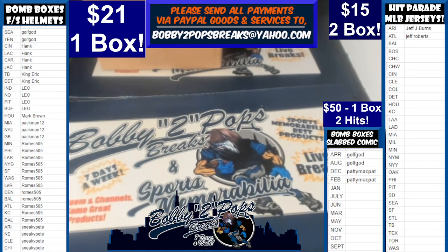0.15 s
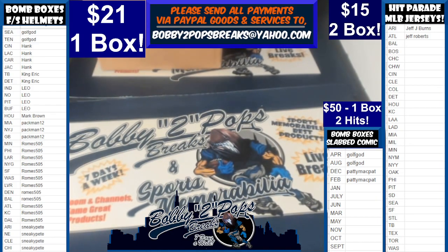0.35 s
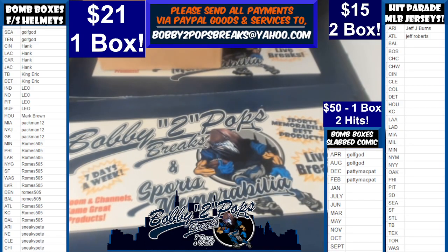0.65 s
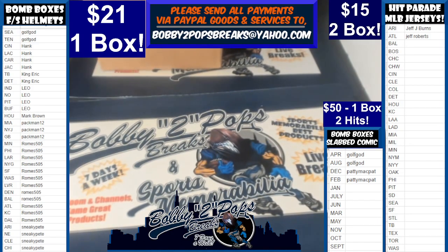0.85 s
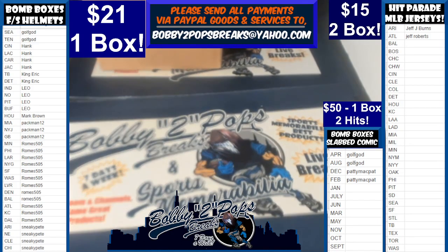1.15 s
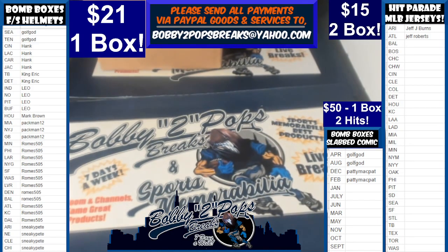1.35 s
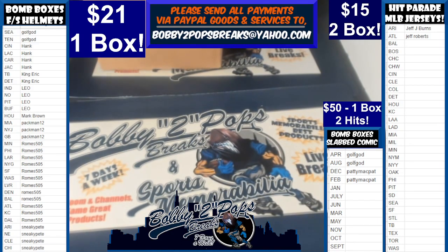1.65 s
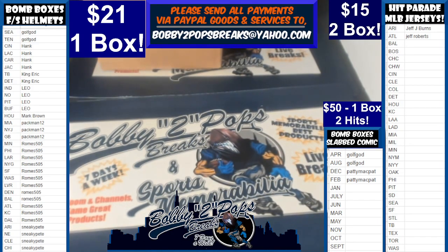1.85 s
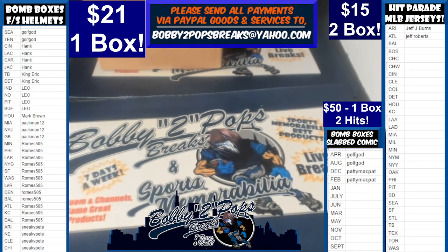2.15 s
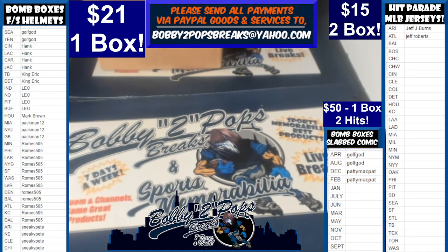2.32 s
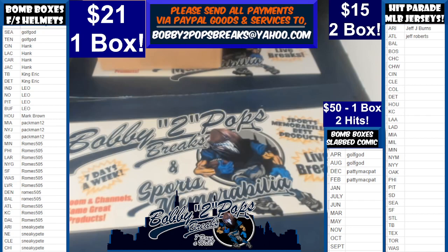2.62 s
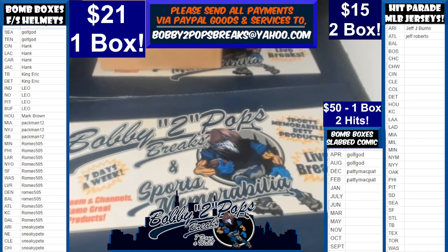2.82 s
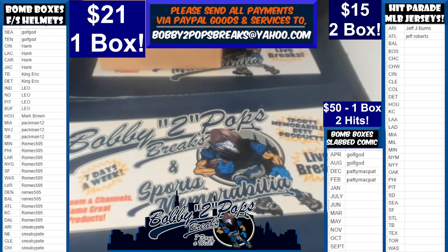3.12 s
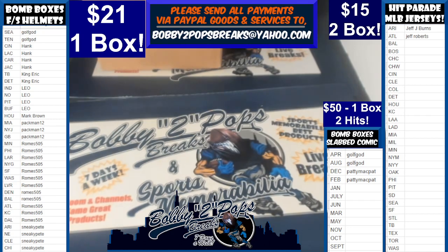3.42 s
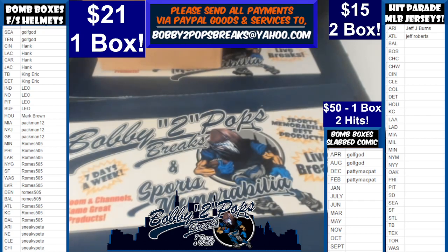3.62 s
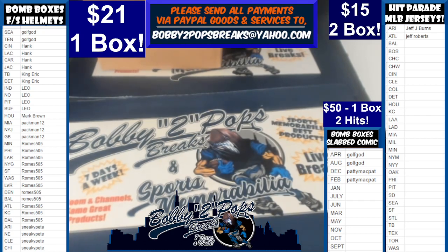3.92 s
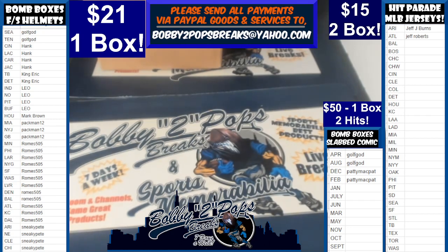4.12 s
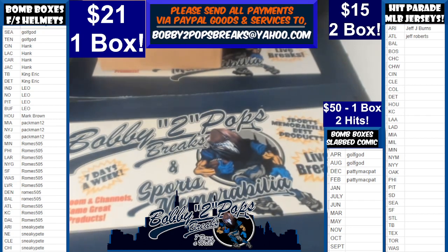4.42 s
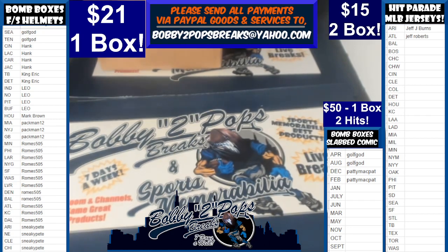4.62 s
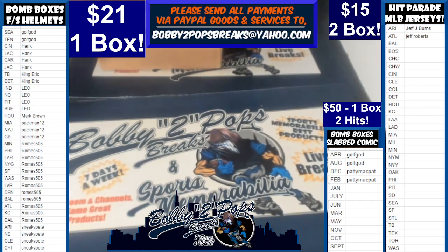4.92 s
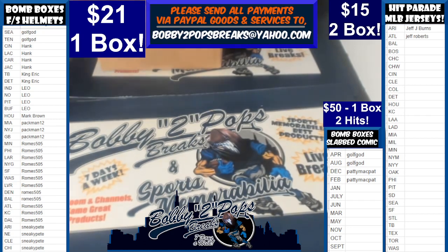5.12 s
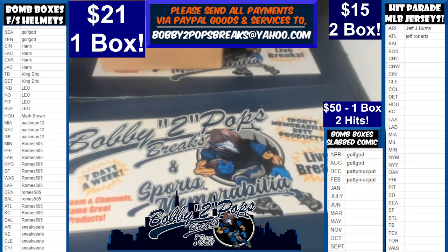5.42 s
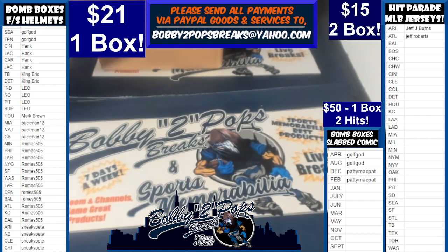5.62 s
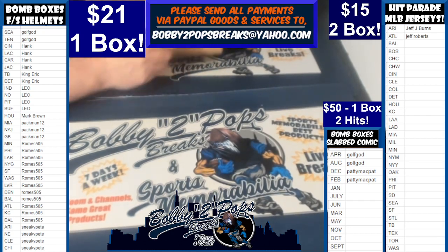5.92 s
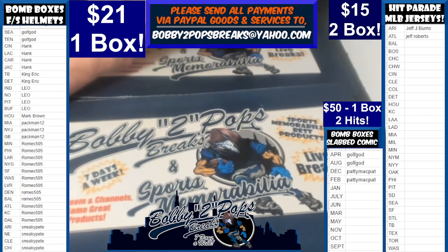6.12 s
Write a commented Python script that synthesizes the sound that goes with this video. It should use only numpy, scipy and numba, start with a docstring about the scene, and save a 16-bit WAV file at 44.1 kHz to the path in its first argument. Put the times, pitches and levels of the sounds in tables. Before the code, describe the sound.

A close, dry tabletop scene in a small soft room, with a very faint steady hum and air noise beneath. From 0 to 1 second a hand makes soft, gritty brushes on card and cloth, with a muted knock at the start and tiny edge ticks. Fuller strokes come around 1.1 to 1.8 seconds, then a near lull. From 2.3 to 3.2 seconds the rubbing is longer and stronger, swelling unevenly. A tight cluster of crisp clicks falls at 3.5. A broad, heavier swipe passes at 4.0, followed by faint rustles and a short, thin, rising squeak near 4.5. At 4.94 a box knocks down sharply, with a brief scrape at 5.15; a second hard knock hits at 5.38, and a duller bump follows at 5.6. Short slides and light brushes fade away, with a small tick at 6.13 and a soft low tap near 6.24.

```python
"""A hand's gritty hiss on card and cloth is heard first, with a soft knock in it; strokes swell and die away.
Small edges tick, a fingertip squeaks on glossy card and two boxes knock down hard on a covered table.
Friction is modelled as grainy noise under a moving spectrum, sliding as noise driving broad resonances,
and impact as decaying modes with a crack and a rattle; faint machine tones and air noise lie beneath."""
import sys
import numpy as np
from scipy import signal
from scipy.fft import rfft, irfft
from scipy.io import wavfile
from scipy.ndimage import uniform_filter1d
from numba import njit

SR = 44100
rng = np.random.default_rng(int(sys.argv[2]) if len(sys.argv) > 2 else 0)


def wav_record(signal):
    """Record a signal, one row per channel, as 16-bit PCM in the file named by sys.argv[1]."""
    frames = np.transpose(np.atleast_2d(signal))
    bounded = np.clip(frames, -1, 1)
    # unit amplitude maps onto the largest positive 16-bit level
    quanta = np.round(bounded * 32767).astype(np.int16)
    wavfile.write(sys.argv[1], SR, quanta)


N = 276286

# Machine tones: mean [f/Hz, rms level/dB]
HUM_TONES = [(253.0, -74.5), (306.8, -82.5), (344.5, -84), (441.4, -78.5), (511.4, -86.5)]
# Spectrum of the air noise: [f/Hz, relative density/dB per Hz]
AIR_SPECTRUM = [(18, -46), (30, -13.5), (163, -12.5), (253, -3), (384, -11), (437, -1), (497, -9.5),
                (859, -8.5), (1200, -12.5), (1410, -12), (7830, -31.5), (15000, -41)]
AIR_DB = -71.5  # rms before its slow swell
# Edges ticking: [t/s, nominal level/dB, f/Hz, t60 of the scratchy tail/s]
EDGE_TICKS = [(0.4738, -52, 7290, 0.029), (0.622, -54, 9800, 0.018), (0.6722, -45, 7300, 0.014),
              (0.7563, -42, 3870, 0.023), (0.8919, -38, 5000, 0.019), (1.5227, -39.5, 5640, 0.019),
              (2.376, -58, 3760, 0.018), (2.7354, -38.5, 3000, 0.034), (3.1715, -44, 2860, 0.045),
              (3.4745, -34, 3700, 0.017), (3.4756, -33.5, 2060, 0.023), (3.4932, -27.5, 2580, 0.01),
              (3.494, -40.5, 1180, 0.05), (3.504, -28.5, 3220, 0.0043), (4.292, -57, 8510, 0.017),
              (4.593, -52, 6500, 0.025), (4.6067, -45, 6700, 0.024), (4.667, -65, 10000, 0.01),
              (4.8837, -54, 5760, 0.015), (5.1235, -47.5, 5600, 0.035), (5.6037, -34, 1300, 0.034),
              (5.618, -40, 1510, 0.051), (5.75, -56, 3400, 0.057), (6.128, -34, 8150, 0.011)]
# Blows: [t/s, level/dB, nominal contact/ms, table share/dB, box share/dB, crack/dB, rattle/dB]
BLOWS = [(0.023, -46, 1.6, -5, -11, -23, -10), (1.471, -57.5, 5.3, 9, -14, -30, -16),
         (3.4745, -55, 0.26, -4, -14, -10, -8), (3.493, -53.5, 0.15, -6, -5, -3, -0.5),
         (3.52, -60, 5.9, 4, -7, -30, -23), (4.9355, -27, 0.89, -8, -1.5, -27, -9),
         (4.9422, -20.5, 0.21, -13, -14.5, 12, -6), (4.957, -29.5, 0.71, -14, 3, -7, -6),
         (5.149, -36.5, 1.75, -19, 5.5, -32, -15), (5.3787, -19, 0.32, -3, -31, 4.5, -7),
         (5.3839, -23.5, 0.25, -18, -28, 11, -19), (5.397, -28.5, 2.4, -1.5, -24, -34.5, -4),
         (5.421, -39, 0.17, -2, -18, -9.5, -2), (5.603, -23, 4.7, -7, -9, -42, -10),
         (5.612, -38.5, 2.3, -18, 11, -40.5, -5), (6.128, -44.5, 1.6, -22, -14, -30, -1),
         (6.232, -50, 3.2, 6, -2, -28, -24), (6.2415, -35, 6.6, 0.5, -20, -27, -25)]
# Modes of the struck table: [f/Hz, level/dB, t60/s], nominal: each blow scatters f and level, shortens t60
TABLE_MODES = [(71, -10, 0.17), (140, -25, 0.11), (207, -7, 0.17), (253, -7, .12), (338, -5.5, 0.061),
               (435, -8, 0.17), (482, -28, 0.093), (600, -38, 0.076), (1099, -3, 0.099),
               (1840, -6.5, 0.082), (2080, -10.5, 0.12), (2220, -14, 0.058)]
# Modes of the struck box: [f/Hz, level/dB, t60/s], nominal in the same way
BOX_MODES = [(546, -15, 0.18), (625, -7, 0.11), (783, -18, 0.24), (1024, -23.5, 0.16), (1260, -6.5, 0.088),
             (1426, -12, 0.15), (1990, -27, 0.21), (2450, -31, 0.12), (3330, -27, 0.15), (3770, -19, 0.033)]
# Decay of the rattle bands: [f/Hz, t60/s]
RATTLE_DECAYS = [(300, 0.077), (800, 0.083), (2200, 0.026), (5500, 0.14), (10000, 0.068)]
# Strength of the same rattle bands: [f/Hz, relative level/dB]
RATTLE_LEVELS = [(300, -10), (800, 0.5), (2200, 0), (5500, -4.5), (10000, -33)]
# Low resonance of a sliding box: [f/Hz, nominal width/Hz, relative level/dB]
BOX_HUM_MODES = [(521, 44, 0.0038)]
# Upper resonances of a sliding box: [f/Hz, nominal width/Hz, relative level/dB]
BOX_UPPER_MODES = [(687, 68, -8.5), (786, 176, -8.5), (964, 580, -13.5)]
# Low resonances of the table under a slide: [f/Hz, nominal width/Hz, relative level/dB]
TABLE_THRUM_MODES = [(210.8, 28, -2.5), (67, 35, -11)]
# Weight dragged over the table: [t/s, hold/s, box hum/dB, box upper modes/dB, table thrum/dB]
DRAGS = [(0.031, .034, -75.5, -62.5, -67), (0.16, 0.018, -85, -82, -97), (1.22, 0.0077, -75, -66, -99),
         (1.273, 0.0091, -77, -66, -67), (1.32, 0.064, -66.5, -66, -73), (1.495, 0.0082, -70.5, -73, -60.5),
         (1.59, 0.0063, -62, -65, -73), (1.785, 0.056, -76, -65, -73.5), (2.4, .95, -86, -90, -81),
         (2.563, .02, -93, -96, -69), (2.707, 0.011, -88, -66, -65), (2.998, 0.015, -82, -86, -63.5),
         (3.386, 0.0086, -69.5, -77, -64.5), (3.526, 0.0043, -76, -82, -55.5),
         (4.03, .055, -70, -56, -54.5), (5.153, 0.036, -52.5, -50, -52.5), (5.323, .01, -72, -60, -61),
         (5.638, 0.0021, -52.5, -58, -55), (5.715, 0.039, -58.5, -51, -80),
         (5.79, 0.065, -52.5, -56.5, -70), (5.923, .06, -78, -80, -74), (6.138, 0.025, -71, -81, -77),
         (6.19, 0.017, -83, -59.5, -67)]
# Basic spectrum of skin on card: [f/Hz, relative density/dB per Hz]
SKIN_SPECTRUM = [(500, 28.5), (2000, -1), (5000, -0.5), (8000, -1), (10500, -4.5), (12500, -12.5),
                 (14500, -17.5), (16000, -24)]
# Hand strokes: [t at full pressure/s, rise/ms, hold/ms, fall/ms, hiss level/dB,
#                weight of contact/dB, brightness/dB]
STROKES = [(0.0, 100, 90, 200, -53.5, -3, -6), (0.123, 60, 5, 60, -52.5, -7, -13.5),
           (0.17, 60, 44, 61, -57, -8, -8), (0.2, 100, 1550, 100, -75, -8, -8),
           (0.302, 100, 30, 92, -64, -8, 0.5), (0.393, 25, 27, 100, -61, -12, -2),
           (0.474, 28, 2, 40, -58.5, -10, -5.5), (0.529, 68, 15, 40, -63, -12, -1.5),
           (0.625, 10, 25, 80, -66.5, -9, 2), (0.673, 30, 37, 120, -62, -15.5, -9),
           (0.758, 42, 4.5, 130, -63.5, -10, -16), (0.848, 100, 91, 55, -61.5, -9.5, -7),
           (0.892, 35, 2, 47, -54.5, -15, -12), (1.047, 48, 2, 30, -74, -10, -14),
           (1.07, 37, 3.7, 25, -56, -20.5, -37), (1.135, 27, 6.2, 66, -54, -3.5, -7),
           (1.26, 47, 11, 170, -51, -4, -6), (1.318, 64, 5.5, 120, -53, 0, -8.5),
           (1.432, 53, 63, 63, -57, -18, -22.5), (1.537, 38, 55, 41, -58, -16, -14),
           (1.763, 64, 49, 53, -53.5, -11, -8), (1.9, 100, 150, 220, -76, -10, -11),
           (2.383, 45, 905, 70, -50, -5, -10), (2.538, 60, 51, 48, -48.5, -2.5, -11.5),
           (2.716, 190, 2, 24, -49, -3.5, -8.5), (2.826, 170, 1.8, 140, -48, -2.5, -7),
           (2.968, 50, 15, 35, -53, -7, 0), (3.098, 85, 2.3, 28, -45, -3, -5.5),
           (3.335, 72, 41, 56, -56.5, -0.5, -16), (3.4, 55, 40, 60, -68, 7, -5),
           (3.5, 50, 220, 150, -71, 4, 5), (3.48, 52, 18, 26, -53.5, 0, -17),
           (3.562, 74, 8.9, 61, -67, 0, -12), (3.688, 64, 2, 88, -68, -11.5, -17),
           (4.016, 60.5, 66, 134, -43.5, -0.5, -9.5), (4.155, 150, 23, 56, -53.5, 2.5, -6),
           (4.23, 40, 18.7, 34.5, -70.5, 7, -16.5), (4.292, 12, 2, 15, -67, -5, -2),
           (4.368, 87, 1.8, 79, -60.5, -6, -0.5), (4.47, 120, 72, 50, -70, 2, -1),
           (4.598, 13, 6, 20, -60, -16, 15), (5.057, 40, 57, 100, -60, -22, 0),
           (5.137, 33, 80, 100, -51, -1, -5), (5.27, 40, 68, 34, -56, -17.5, -5.5),
           (5.372, 20, 4.6, 34, -40.5, 5, -4), (5.48, 50, 700, 50, -78, -15, -3),
           (5.42, 24, 2, 51, -49, 7.5, 1.5), (5.592, 52, 2, 30, -60.5, -20, 4),
           (5.605, 13, 2.2, 47, -49, -13, -6.5), (5.688, 42, 2, 73, -65, -5, 3.5),
           (5.76, 60, 25, 120, -82, -3, -4), (5.912, 80, 5, 48, -61.5, -23.5, -15),
           (5.998, 90, 8.3, 49, -56.5, -24, -12), (6.128, 18, 36, 54, -57.5, -13.5, 1.5),
           (6.228, 50, 30, 100, -73, -3, -13)]

DRAG_RISE_S, DRAG_FALL_S = 0.036, 0.041
SQUEAK_S, SQUEAK_DB, SQUEAK_HZ, SQUEAK_GLIDE_HZ_S = 4.534, -55, 6240, 3900
SQUEAK_RISE_S, SQUEAK_HOLD_S, SQUEAK_FALL_S = 0.043, 0.017, 0.016
WEIGHT_PER_DB, BRIGHT_PER_DB = 0.62, 0.3  # contact gets heavier and brighter as a stroke swells
ROUNDNESS = 1.415  # slope of a swell in dB: 1 = straight, 2 = a bell
CONTROL_STEP = 32  # samples between control values
TOP_HZ = 15500


def undb(db):
    """Amplitude ratio of a level in dB."""
    return 10 ** (np.asarray(db) / 20)


def unit(x):
    """Normalise to unit rms."""
    return x / np.sqrt(np.mean(x ** 2))


@njit
def svf(x, hz, width):
    """State-variable resonance: a band-pass with gain 1 at its centre."""
    y, band, low = np.empty(len(x)), 0., 0.
    g, k = np.tan(np.pi * hz / SR), width / hz
    for i in range(len(x)):
        v = (band + g * (x[i] - low)) / (1 + g * (g + k))
        band, low, y[i] = 2 * v - band, low + 2 * g * v, k * v
    return y


def resonate(x, hz, width):
    """Two equal resonances in cascade, normalised to unit rms."""
    once = svf(x, 1. * hz, 1. * width)
    return unit(svf(once, 1. * hz, 1. * width))


def walk(rate):
    """Slow random modulation: values drawn at rate per second, smoothly joined; spread near 1."""
    k = int(SR / rate)
    points = rng.standard_normal(N // k + 2)
    joined = np.interp(np.arange(N) / k, np.arange(len(points)), points)
    return 1.25 * uniform_filter1d(joined, k)


def on_log(hz, points):
    """Interpolate a spectrum linearly over log frequency."""
    point_hz, values = np.array(points).T
    return np.interp(np.log(hz), np.log(point_hz), values)


def fade(t, t60):
    """Exponential decay, 60 dB down after t60 (at least 2 ms)."""
    return np.exp(-np.log(1000) * t / np.maximum(t60, .002))


def add(out, s, x):
    """Superpose x on out from time s."""
    i = int(s * SR)
    out[i:i + len(x)] += x[:N - i]


def grit(spread_db, dense, most_db=14):
    """Grainy friction: noise in which a share of samples are grains of widely spread size."""
    size_db = np.minimum(spread_db * rng.exponential(size=N), most_db)
    grains = undb(size_db) * (rng.random(N) < dense)
    return rng.standard_normal(N) * (1 + grains)


def swell_db(s, rise_s, hold_s, fall_s):
    """Envelope in dB below its top, 20 dB down one rise before or one fall after the hold; a row per event."""
    t = np.arange(0, N + CONTROL_STEP, CONTROL_STEP) / SR
    s, rise_s, hold_s, fall_s = (np.reshape(v, (-1, 1)) for v in (s, rise_s, hold_s, fall_s))
    early = (s - t) / np.maximum(rise_s, .003)
    late = (t - s - np.maximum(hold_s, 0)) / np.maximum(fall_s, .003)
    return -20 * np.clip(np.maximum(early, late), 0, 4) ** ROUNDNESS


def fine(x):
    """Linear interpolation of a control to every sample."""
    return np.interp(np.arange(N), np.arange(len(x)) * CONTROL_STEP, x)


def room_tone():
    """Steady background: machine tones wavering in level and phase over coloured air noise."""
    t, swell = np.arange(N) / SR, undb(1.5 * walk(6.8))
    hum = np.zeros(N)
    for hz, db in HUM_TONES:
        level = np.sqrt(2) * undb(db + 1.1 * walk(5.23))
        hum += level * np.sin(2 * np.pi * hz * t + 1.23 * walk(3))
    colour = undb(on_log(np.arange(1, N // 2 + 2) * SR / N, AIR_SPECTRUM))
    air = unit(irfft(rfft(rng.standard_normal(N)) * colour, N))
    return hum + undb(AIR_DB) * swell * air


def room(dry, wet_db=-14, t60=0.15):
    """Reverberation of a small soft room: convolution with a dense, band-limited decaying tail."""
    t = np.arange(SR // 2) / SR
    tail = svf(rng.standard_normal(len(t)), 1730.0, 3900.0) * fade(t, t60) * (t > .003)
    tail = tail / np.sqrt(np.sum(tail ** 2))
    return dry + undb(wet_db) * signal.fftconvolve(dry, tail)[:N]


def squeak():
    """Fast slips of a fingertip on glossy card: a gliding, wobbling tone blurred by narrow noise."""
    under = swell_db(SQUEAK_S, SQUEAK_RISE_S, SQUEAK_HOLD_S, SQUEAK_FALL_S)[0]
    gain = fine(undb(SQUEAK_DB + under))
    blur = unit(svf(rng.standard_normal(N), 300., 550.0))
    hz = SQUEAK_HZ + SQUEAK_GLIDE_HZ_S * np.clip(np.arange(N) / SR - SQUEAK_S, -.1, .1)
    tone = np.sin(2 * np.pi * np.cumsum(hz * (1 + 0.05 * walk(900))) / SR)
    # the card under the finger hums along
    card = unit(svf(rng.standard_normal(N), 1550., 120.))
    return (tone + undb(-16) * card) * (1.0 + 0.28 * blur) * gain


def ticks():
    """Impulsive excitation of an edge: a short damped ring at its pitch, with a scratchy tail."""
    out, t = np.zeros(N), np.arange(SR // 10) / SR
    for s, db, hz, t60 in EDGE_TICKS:
        scratch = resonate(rng.standard_normal(len(t)), hz, 0.43 * hz)
        onset = np.minimum(t * hz, 1)  # one period
        ping = np.sin(2 * np.pi * hz * t) * fade(t, 0.0036) * onset
        add(out, s, undb(db) * (0.86 * ping + 0.52 * scratch * fade(t, t60)))
    return out


def ring(modes, t, scatter_db=3.0, shorter=0.76):
    """Modal superposition: modes start together; each blow lands elsewhere, so strengths scatter."""
    hz, db, t60 = np.transpose(modes)[:, :, None]
    level_chance, pitch_chance = rng.standard_normal((2, len(modes), 1))
    level = undb(db + scatter_db * level_chance)
    tone = np.sin(2 * np.pi * hz * (1 + 0.0071 * pitch_chance) * t)
    return np.sum(level * tone * fade(t, shorter * t60), 0)


def blows():
    """Impact: a force pulse rings table, box and rattle, duller for longer contact; a crack is added."""
    out, t = np.zeros(N), np.arange(SR // 4) / SR
    for s, db, contact_ms, table_db, box_db, crack_db, rattle_db in BLOWS:
        body = undb(table_db) * ring(TABLE_MODES, t) + undb(box_db) * ring(BOX_MODES, t)
        noise = rng.standard_normal(len(t))
        for (hz, t60), (_, tone_db) in zip(RATTLE_DECAYS, RATTLE_LEVELS):
            rattle = resonate(noise, hz, 3.05 * hz) * fade(t, t60)
            body = body + undb(rattle_db + tone_db) * rattle
        push_s = max(contact_ms, .02) * 1e-3 / 7  # time from onset to the peak of the force
        push = t[:600] * np.exp(-t[:600] / push_s)
        body = np.convolve(body, push / push.sum())
        snap = t / (0.00029 * contact_ms)  # the crack peaks within a fraction of the contact
        body[:len(t)] += undb(crack_db) * np.cos(0.88 * snap) * snap * np.exp(1 - snap)
        add(out, s, undb(db) * body)
    # a thin table top radiates the deep bass poorly
    return signal.sosfilt(signal.butter(2, 115, "high", fs=SR, output="sos"), out)


def drag():
    """Stick-slip under a sliding box: grainy force drives the low resonances of box and table."""
    slip = grit(spread_db=5.0, dense=0.004) * undb(1.4 * walk(50))
    s, hold, *levels_db = np.transpose(DRAGS)[:, :, None]
    under = swell_db(s, DRAG_RISE_S, hold, DRAG_FALL_S)
    out = np.zeros(N)
    for modes, db in zip((BOX_HUM_MODES, BOX_UPPER_MODES, TABLE_THRUM_MODES), levels_db):
        # sections are widened because two in cascade narrow the resonance
        body = sum(undb(mode_db) * resonate(slip, hz, 1.62 * width) for hz, width, mode_db in modes)
        out += body * fine(undb(db + under).sum(0))
    return out


def hand():
    """Superposition of strokes in power; gain, weight and brightness follow the loudest contact."""
    s, rise, hold, fall, db, weight_db, bright_db = np.transpose(STROKES)[:, :, None]
    under = swell_db(s, rise / 1000, hold / 1000, fall / 1000)
    power = undb(db + under) ** 2
    total = power.sum(0)
    pressed_db = np.maximum(under, -25)
    weight = np.sum(power * (weight_db + WEIGHT_PER_DB * pressed_db), 0) / total
    bright = np.sum(power * (bright_db + BRIGHT_PER_DB * pressed_db), 0) / total
    return fine(np.sqrt(total)), fine(weight), fine(bright)


def brush():
    """Sliding friction: gritty hiss whose bottom edge sinks with weight and whose top lifts with brightness."""
    rough = grit(spread_db=4.0, dense=.03) * undb(1.2 * walk(70))
    hz, t, frames = signal.stft(rough, SR, nperseg=256)
    at = np.minimum((t * SR).astype(int), N - 1)
    hz = hz[:, None] + 1  # avoids log of zero
    gain, weight_db, bright_db = hand()
    # a sharp bottom edge over a faint skirt
    edge_hz = np.clip(1350 * 2 ** (-weight_db[at] / 9), 650, 9000)
    skirt = undb(-4.5) * np.minimum(hz / edge_hz, 1) ** 3.02
    bottom = 1 / np.sqrt(1 + (edge_hz / hz) ** 16) + skirt
    # brightness tilts the top per octave above 4500 Hz
    top_db = (bright_db[at] + 8.5) * np.clip(np.log2(hz / 4500), 0, 1.6)
    # random patches smoothed over frequency, then time
    patches = uniform_filter1d(rng.standard_normal(frames.shape), size=9, axis=0)
    patches_db = 22.5 * uniform_filter1d(patches, size=15, axis=1)
    shape = bottom * undb(on_log(hz, SKIN_SPECTRUM) + top_db)
    shape = shape / np.sqrt(np.mean(shape ** 2, 0)) * undb(patches_db)
    return unit(signal.istft(frames * shape, SR, nperseg=256)[1][:N]) * gain


def scene():
    """Superposition of all sources; only blows and ticks excite the room."""
    struck = room(blows() + ticks())
    return (room_tone() + struck + squeak() + drag() + brush())[None]


def record(dry):
    """Band-limiting by the microphone: deep bass and high treble roll off, and the top is cut steeply."""
    thin = signal.sosfilt(signal.butter(2, [45, 12500], "band", fs=SR, output="sos"), dry)
    return signal.sosfilt(signal.ellip(10, .2, 80, TOP_HZ, fs=SR, output="sos"), thin)


dry = scene()
out = record(dry)
wav_record(out)
```